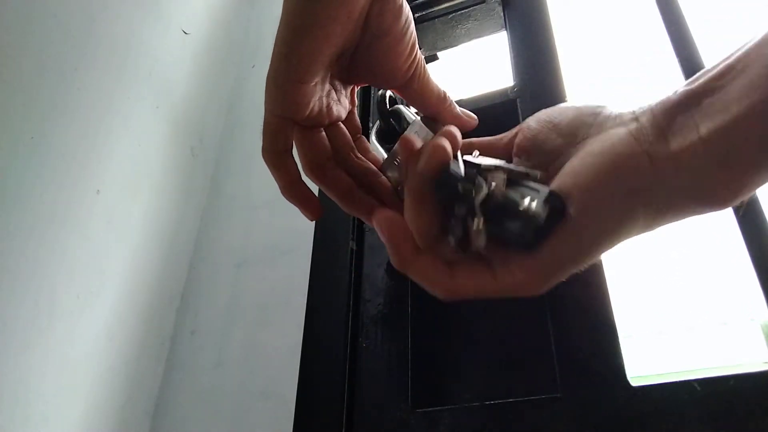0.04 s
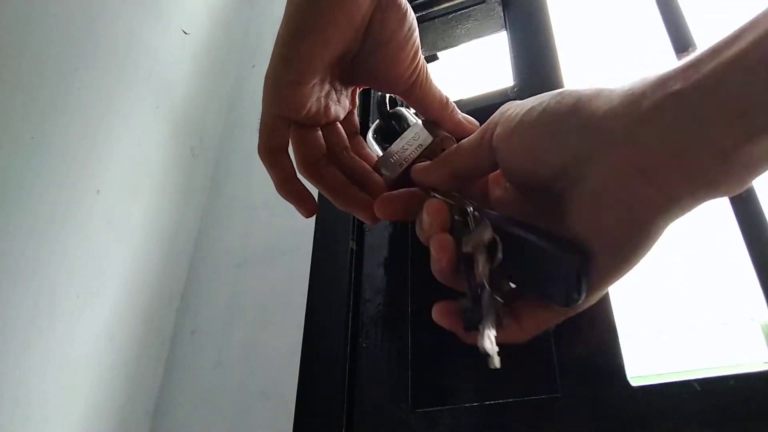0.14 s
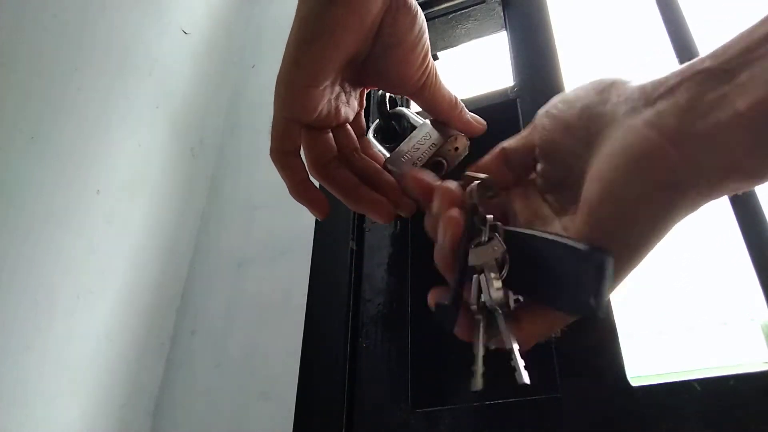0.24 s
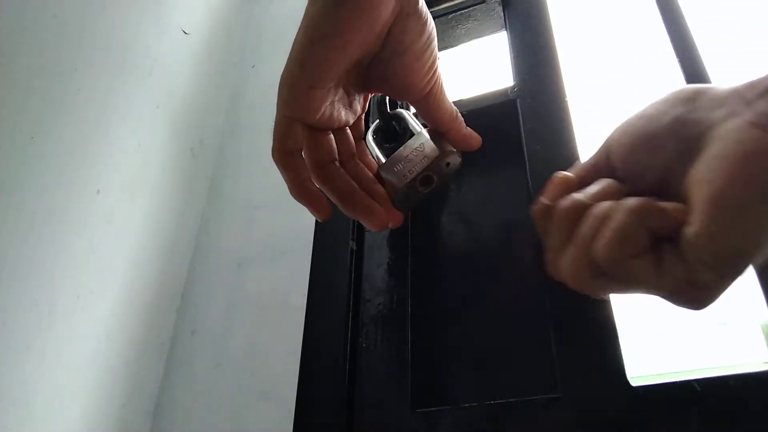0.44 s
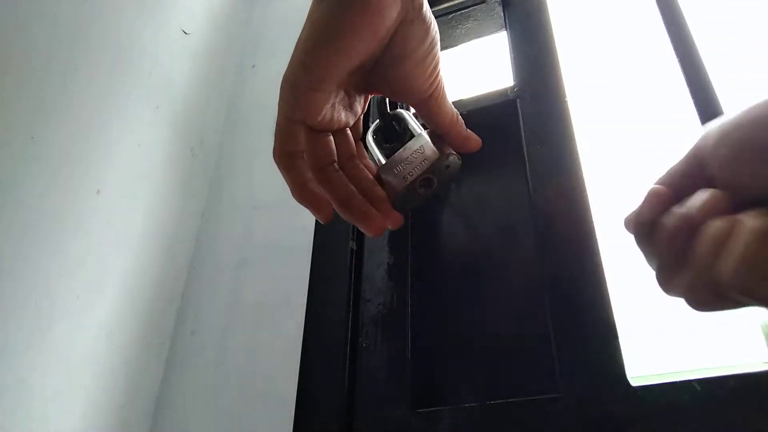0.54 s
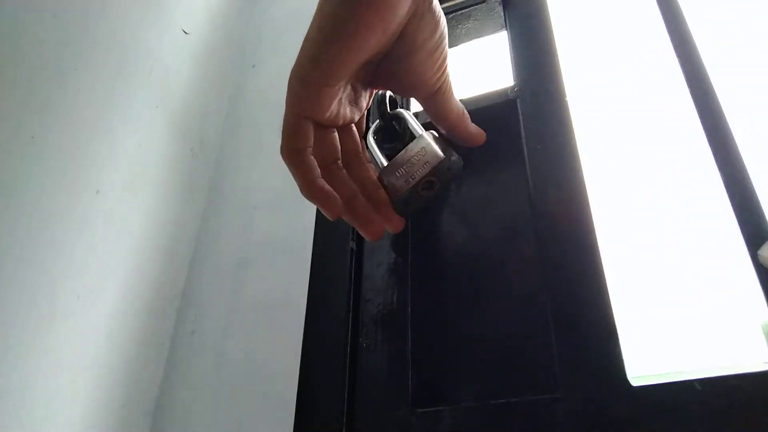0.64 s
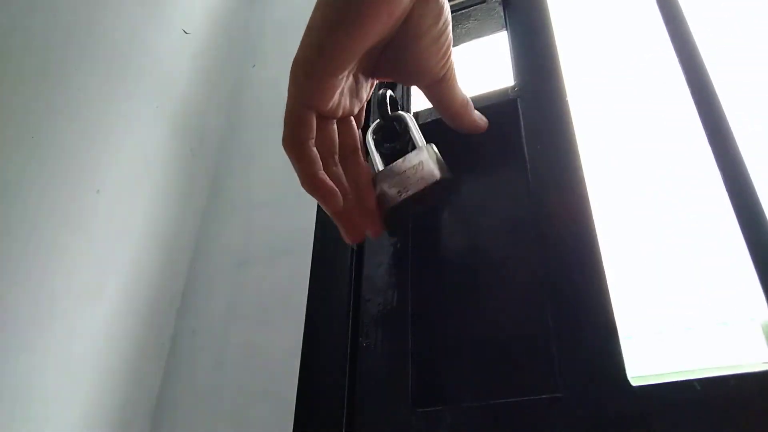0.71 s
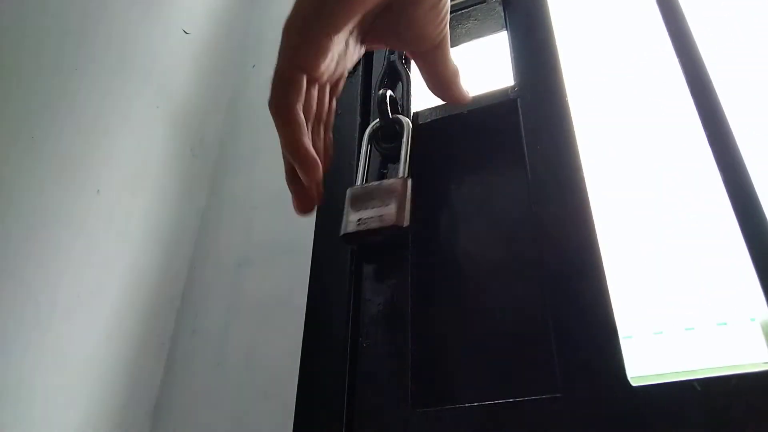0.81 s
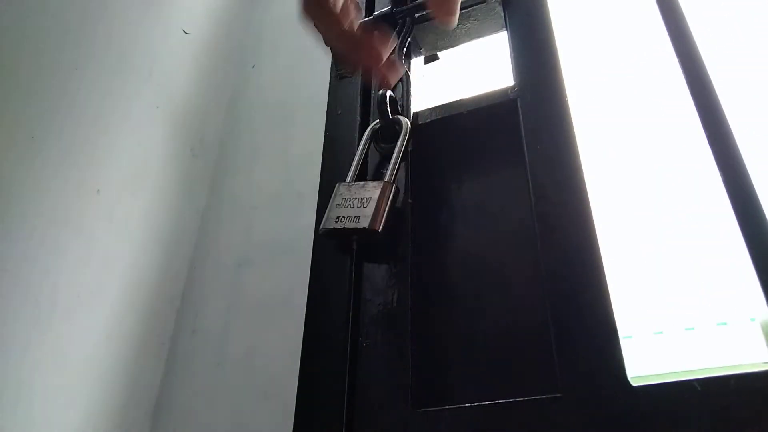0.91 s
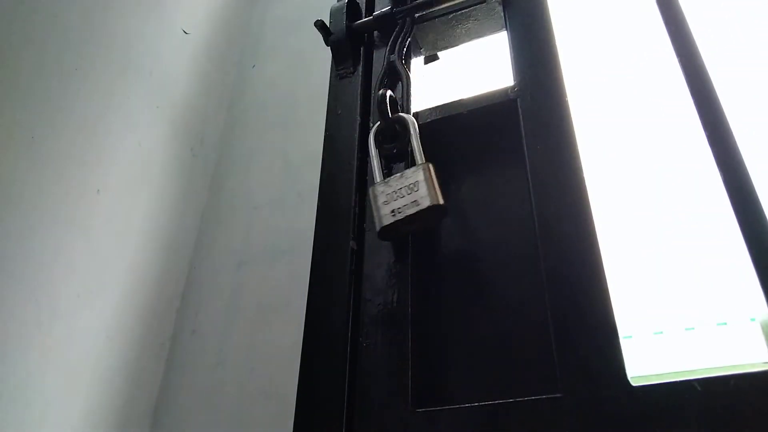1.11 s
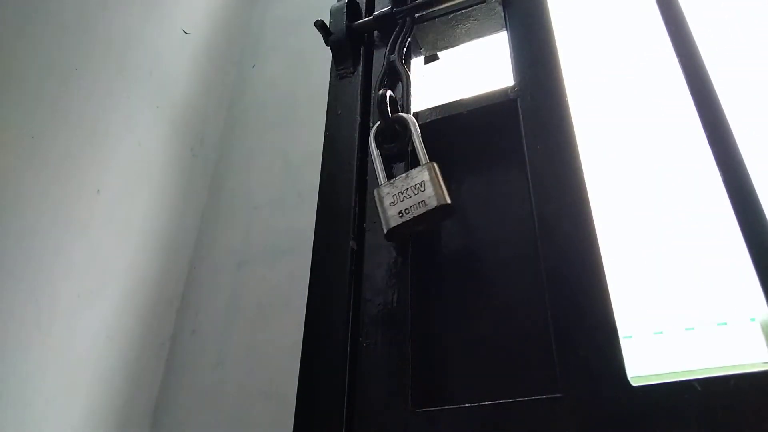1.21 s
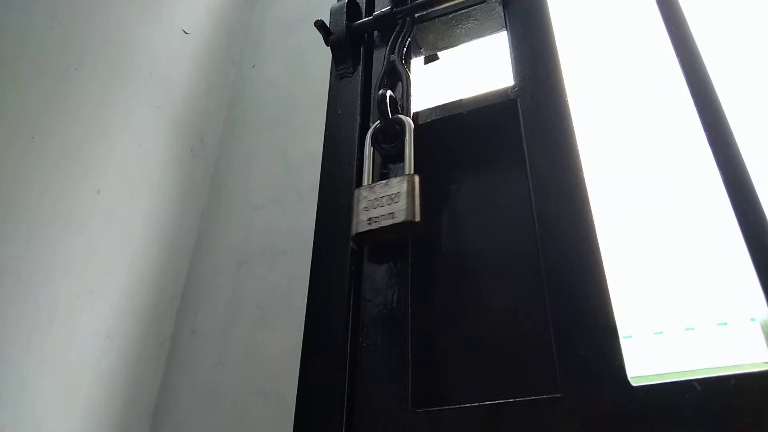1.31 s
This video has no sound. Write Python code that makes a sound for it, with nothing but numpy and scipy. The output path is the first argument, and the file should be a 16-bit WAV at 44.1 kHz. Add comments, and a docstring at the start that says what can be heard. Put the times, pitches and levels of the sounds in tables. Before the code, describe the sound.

Keys jingle close by, ticking in a hand and clicking on a padlock at first, then chiming loosely from about 0.2 seconds until one second. The padlock snaps against its hasp near 0.65 seconds and hits a metal door with a chattering bang at 0.75. It scrapes briefly, clanks at about 0.9 and rings away in a light hallway echo, with one faint tap at 1.2.

```python
"""A bunch of keys is drawn from a padlock on a steel door, close by in a bare hallway.
The keys tick in the hand, then swing free, slide over each other and chime. The padlock snaps against
its hasp, drops onto the door with a chattering bang, scrapes along it and clanks, ringing out.
Impacts ring a few clear modes plus a dense cluster made of decaying noise; sliding is a stream of
tiny random catches. The hallway adds an echo and a faint low background."""
import sys
import numpy as np
from scipy import signal
from scipy.fft import irfft, next_fast_len
from scipy.io import wavfile

SR = 44100
rng = np.random.default_rng(int(sys.argv[2]) if len(sys.argv) > 2 else 0)


def digitize_waveform(pressure):
    """Quantize a signal to 16-bit integers and store it at the path in sys.argv[1].

    Rows of a 2-D input are taken as channels; values are limited to [-1, 1].
    """
    field = np.atleast_2d(pressure).T
    bounded = np.clip(field, -1, 1)
    quanta = np.round(bounded * 32767).astype(np.int16)
    wavfile.write(sys.argv[1], SR, quanta)


N = 59535
T = np.arange(N) / SR


def undb(db):
    """Decibels to gain."""
    return 10 ** (np.asarray(db) / 20)


def decay(t60):
    """Exponential fall, 60 dB in t60 seconds."""
    return np.exp(-np.log(1000) * T / t60)


def noise_spectrum(colour, tilt_db_oct=0):
    """Frequencies and random-phase spectrum of unit-rms coloured noise."""
    size = next_fast_len(N + N % 2)
    hz = np.maximum(np.arange(size // 2 + 1) * SR / size, 1)
    knots_hz, knots_db = np.array(colour, float).T
    db = np.interp(np.log(hz), np.log(knots_hz), knots_db)
    db += tilt_db_oct * np.log2(np.maximum(hz, 200))
    spectrum = undb(db) * np.exp(2j * np.pi * rng.random(len(hz)))
    return hz, spectrum / irfft(spectrum).std()


def dense_ring(colour, t60, damping, tilt_db_oct=0):
    """Unresolved modes as seven decaying noise bands; decay time is t60 * (f / 1 kHz) ** -damping."""
    hz, spectrum = noise_spectrum(colour, tilt_db_oct)
    centres_hz = np.geomspace(150, 15000, 7)
    out = 0
    for centre_hz, share in zip(centres_hz, np.eye(7)):
        band = irfft(spectrum * np.interp(np.log(hz), np.log(centres_hz), share))[:N]
        out += band * decay(t60 * (centre_hz / 1000) ** -damping)
    return out


def wander(per_s):
    """Smooth random complex drift of level and phase."""
    real, imag = rng.standard_normal((2, 1024))
    return np.interp(T * per_s, np.arange(1024), real + 1j * imag)


def ring(modes, t60_scale=1, waver=0):
    """Clear decaying modes at random phase; they waver when the metal swings."""
    out = 0
    for hz, db, t60 in modes:
        drift = wander(per_s=57.8) + 0.51 * wander(per_s=200)
        phasor = np.exp(2j * np.pi * (hz * T + rng.random()))
        tone = ((1 + waver * drift) * phasor).imag / np.sqrt(1 + waver ** 2)
        out += undb(db) * decay(t60 * t60_scale) * tone
    return out


def strike(time_s, db, sound, attack_s=0.00026):
    """Place a sound at its time and level, rising over the contact time."""
    start = int(time_s * SR)
    hit = undb(db) * sound * np.minimum(T / attack_s, 1)
    return np.pad(hit, (start, 0))[:N]


def slide(levels, body, catches_per_s):
    """Metal sliding on metal: tiny random catches, each ringing the body."""
    caught = rng.random(N) < catches_per_s / SR
    spread_db = 3.5 * np.clip(rng.standard_normal(N), -2, 2)
    catches = caught * undb(spread_db) * rng.choice([-1, 1], N)
    times_s, db = np.array(levels).T
    pressure = undb(np.interp(T, times_s, db)) * (T > times_s[0]) * (T < times_s[-1])
    return signal.fftconvolve(pressure * catches / catches.std(), body / np.linalg.norm(body))[:N]


# Gripped key modes (frequency [Hz], level [dB], relative t60 [ratio])
GRIP_MODES = [(8120, -5.5, 0.5), (8570, -2.5, 0.87), (14840, -3, 0.61), (16400, 8, 0.55)]
def gripped_ring(t60):
    """Hand-damped keys, slightly different in pitch each time."""
    modes = [(hz * (1 + rng.uniform(-0.0198, 0.024)), db, ratio) for hz, db, ratio in GRIP_MODES]
    return ring(modes, t60_scale=t60)


# Key ticks (time [s], level [dB], base t60 [s], contact noise re ring [dB])
TICKS = [(.0005, -26.5, .025, -16), (.037, -37, 0.031, -14), (.046, -36, .04, -10.5),
         (0.0689, -24.5, 0.028, -21.5), (0.197, -41, 0.081, 6.5), (0.2473, -19.5, 0.011, -9),
         (0.2819, -34.5, 0.019, 3), (.291, -27, 0.044, -8), (0.3115, -39, 0.017, -8),
         (0.346, -43.5, 0.051, 6.5), (.421, -37.5, 0.044, 3), (0.432, -30.5, .056, -8)]
# Key contact spectrum (frequency [Hz], density [dB])
CONTACT_COLOUR = [(300, -17.5), (1300, -7.5), (3000, -0.5), (5000, -6), (7500, 7.5), (10000, -0.5),
                  (15500, 3)]
def key_ticks():
    """Gripped keys knock together: a short ring plus contact noise."""
    out = 0
    for time_s, db, t60, noise_db in TICKS:
        tone = gripped_ring(t60)
        contact = dense_ring(CONTACT_COLOUR, t60=0.11, damping=0.16)
        out += strike(time_s, db, tone + undb(noise_db) * contact)
    return out


# Keys on the held padlock (time [s], level [dB], tilt [dB/oct])
CLICKS = [(0.0958, -31, -4), (0.1218, -26.5, -1), (.131, -23.5, 2.5), (0.2559, -24.5, -9.5),
          (.293, -39.5, -13), (0.445, -40.5, -12), (0.576, -39.5, 1)]
# Held padlock spectrum (frequency [Hz], density [dB])
HELD_LOCK_COLOUR = [(750, -50), (1200, 0), (1800, 2), (2450, 10.5), (5200, -9), (7400, 4), (11000, -16.5)]
# Held padlock modes (frequency [Hz], level [dB], t60 [s])
HELD_LOCK_MODES = [(1370, -10, .045), (2355, -7, .09), (2470, -5, .08)]
def lock_clicks(low_cut_hz=1030):
    """Keys click on the hand-damped padlock, with little bass below 1 kHz."""
    out = 0
    for time_s, db, tilt in CLICKS:
        body = dense_ring(HELD_LOCK_COLOUR, t60=0.045, damping=0.2, tilt_db_oct=tilt)
        out += strike(time_s, db, body + undb(-5) * ring(HELD_LOCK_MODES))
    return signal.sosfilt(signal.butter(4, low_cut_hz, "high", fs=SR, output="sos"), out)


# Key rustle envelope (time [s], level [dB])
RUSTLE_LEVELS = [(.225, -31.5), (.28, -41), (.40, -56), (.44, -34.5), (.53, -45), (.74, -38)]
def key_rustle():
    """Loose keys slide over each other in small clinks."""
    body = gripped_ring(t60=0.08) + dense_ring(CONTACT_COLOUR, t60=0.09, damping=0)
    return slide(RUSTLE_LEVELS, body, catches_per_s=200)


# Free modes by key (frequency [Hz], level [dB], t60 [s])
KEY_MODES = {"small": [(8450, -23, .2), (14910, -12, .15), (15130, 0, .17), (15228, -4, .2)],
             "flat": [(5955, -9, .15), (10080, 0, .15), (15190, -1, .2)], "long": [(6298, -2, .28),
             (6270, -6, .28), (11322, -2, .38), (11440, -4, .34)], "thin": [(5965, -15, .25),
             (8482, -20, .25), (15160, -1, .22), (15238, -5, .22)], "broad": [(10071, -19, .35),
             (11999, -20, .25), (14675, -14, .22), (15168, 0, .29)]}
# Swell by key (rise time [s])
SWELL_S = {"small": .008, "flat": 0.013, "long": 0.0058, "thin": .005, "broad": 0.016}
# Loose key hits (time [s], key [name], level [dB])
KEY_HITS = [(0.2302, "small", -16.5), (.236, "flat", -33), (0.272, "flat", -29.5), (0.335, "flat", -34.5),
            (.422, "small", -28.5), (0.481, "long", -34), (0.561, "thin", -29.5), (0.58, "flat", -42),
            (.586, "thin", -26.5), (0.702, "thin", -27), (0.747, "small", -29), (0.783, "broad", -21.5),
            (0.841, "broad", -21), (.880, "broad", -19), (0.936, "small", -20), (0.959, "thin", -35),
            (.968, "long", -43)]
def key_chimes():
    """Hanging keys collide; each ring swells and wavers as the key swings round."""
    return sum(strike(time_s, db, ring(KEY_MODES[key], waver=1), attack_s=SWELL_S[key])
               for time_s, key, db in KEY_HITS)


# Finger bumps (time [s], level [dB])
FINGER_HITS = [(0.2353, -38.5), (.516, -38.5)]
# Bump spectrum (frequency [Hz], density [dB])
BUMP_COLOUR = [(100, -21), (400, 2.5), (1000, -4), (4000, -40)]
def finger_bumps():
    """Fingers knock softly on the padlock."""
    return sum(strike(time_s, db, dense_ring(BUMP_COLOUR, t60=0.035, damping=0.77))
               for time_s, db in FINGER_HITS)


# Shackle on the hasp (time [s], level [dB], t60 at 1 kHz [s], tilt [dB/oct])
HASP_HITS = [(.6606, -14, 0.029, 0), (0.6617, -8.5, 0.0056, -0.5), (0.6662, -31, 0.047, 0)]
# Hasp spectrum (frequency [Hz], density [dB])
HASP_COLOUR = [(60, -13), (170, -6), (500, 3.5), (1200, -2.5), (4500, -4.5), (15000, -3.5)]
# Hasp modes (frequency [Hz], level [dB], t60 [s])
SNAP_MODES = [(291.7, -23.5, 0.22), (1442, -24, 0.048)]
def hasp_snap():
    """The shackle snaps against the hasp."""
    out = 0
    for time_s, db, t60, tilt in HASP_HITS:
        body = dense_ring(HASP_COLOUR, t60, damping=0.14, tilt_db_oct=tilt)
        out += strike(time_s, db, body + ring(SNAP_MODES))
    return out


# Padlock on the door (time [s], level [dB], tilt [dB/oct])
DOOR_HITS = [(0.7451, -10.5, 0.5), (.748, -11.5, -1), (0.7553, -12, -3), (0.7606, -16.5, 1.5),
             (0.764, -18, -10), (0.769, -16.5, 0), (0.7813, -21.5, 1), (0.7887, -26, 1.5)]
# Door panel spectrum (frequency [Hz], density [dB])
PANEL_COLOUR = [(40, -25), (200, -14), (900, -2), (1350, -1), (2400, -2.5), (4000, -9), (14000, -20)]
# Door panel modes (frequency [Hz], level [dB], t60 [s])
PANEL_MODES = [(87, -20, .13), (168, -17, .27), (227, -16, .27), (313, -19, .3), (397, -17, .22),
               (788, -18, .25), (1275, -17, .13), (1346, -19, .2), (1888, -16, .12)]
def door_bang():
    """The padlock bounces quickly on the steel panel."""
    out = 0
    for time_s, db, tilt in DOOR_HITS:
        body = dense_ring(PANEL_COLOUR, t60=0.059, damping=0.024, tilt_db_oct=tilt)
        out += strike(time_s, db, body + undb(-6.5) * ring(PANEL_MODES))
    return out


# Scrape envelope (time [s], level [dB])
SCRAPE_LEVELS = [(.80, -30.5), (.84, -35.5), (.872, -25.5), (.903, -26), (.922, -40)]
# Spectrum of one catch (frequency [Hz], density [dB])
CATCH_COLOUR = [(100, -27), (300, -5), (1500, 1.5), (5000, -9.5), (8000, -8), (14000, -12.5)]
def door_scrape():
    """The swinging padlock drags along the door."""
    body = dense_ring(CATCH_COLOUR, t60=0.025, damping=0.054)
    return slide(SCRAPE_LEVELS, body, catches_per_s=1100)


# Free padlock on the door (time [s], level [dB], shackle gain [dB])
CLANK_HITS = [(0.9264, -17.5, 0), (0.929, -19, -16), (0.9413, -30.5, 10), (1.22, -47.5, -24)]
# Free padlock spectrum (frequency [Hz], density [dB])
FREE_LOCK_COLOUR = [(100, -15), (600, -8), (1400, -0.5), (2600, 4), (3900, 3), (5500, -5.5), (8500, -7),
                    (12000, -18)]
# Free padlock modes (frequency [Hz], level [dB], t60 [s])
FREE_LOCK_MODES = [(485, -26, 1.3), (1325, -16, .15), (1692, -15, .42), (1765, -22, .5), (2405, -15, .33),
                   (2523, -15.5, .42), (2610, -18, .3), (2790, -20, .4), (3219, -22, .43), (3655, -20, .5),
                   (4177, -25, .43)]
# Shackle modes (frequency [Hz], level [dB], t60 [s])
CLANG_MODES = [(3655, 3, .065), (3951, -13, .06), (7500, -12, .06)]
def lock_clank():
    """The free padlock swings back, hits shackle first, bounces and rings."""
    out = 0
    for time_s, db, shackle_db in CLANK_HITS:
        body = dense_ring(FREE_LOCK_COLOUR, t60=0.24, damping=0.21)
        tone = ring(FREE_LOCK_MODES, waver=0.71)
        shackle = undb(shackle_db) * ring(CLANG_MODES)
        out += strike(time_s, db, body + tone + shackle)
    return out


# Hallway echo spectrum (frequency [Hz], density [dB])
ECHO_COLOUR = [(60, -12), (200, -7.5), (1200, 0.5), (6000, 2), (15000, 3)]
def hallway_echo(direct, delay_s=0.0074):
    """Diffuse reflections off bare walls; the treble dies first."""
    response = strike(delay_s, 0, dense_ring(ECHO_COLOUR, t60=1.0, damping=0.28))
    return signal.fftconvolve(direct, response / np.linalg.norm(response))[:N]


# Background spectrum (frequency [Hz], density [dB])
BACKGROUND_COLOUR = [(40, -32), (120, 8.5), (200, -20.5), (420, -12.5), (750, -41), (1500, -18.5),
                     (15000, -30)]
def background():
    """Steady low noise of the hallway."""
    _, spectrum = noise_spectrum(BACKGROUND_COLOUR)
    return irfft(spectrum)[:N]


def scene():
    """Keys, padlock, echo and background in mono."""
    direct = key_ticks() + lock_clicks() + key_rustle() + key_chimes() + finger_bumps()
    direct += hasp_snap() + door_bang() + door_scrape() + lock_clank()
    return (direct + undb(-12) * hallway_echo(direct) + undb(-59.5) * background())[None]


def record(dry):
    """High-pass, soft clip, steep low-pass."""
    low_cut_hz, high_cut_hz = 74, 15550
    thinned = signal.sosfilt(signal.butter(3, low_cut_hz, "high", fs=SR, output="sos"), dry)
    rounded = np.tanh(1.235 * thinned) / 1.24
    return signal.sosfilt(signal.ellip(10, 0.2, 70, high_cut_hz, fs=SR, output="sos"), rounded)


dry = scene()
out = record(dry)
digitize_waveform(out)
```